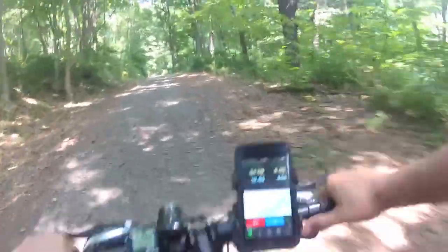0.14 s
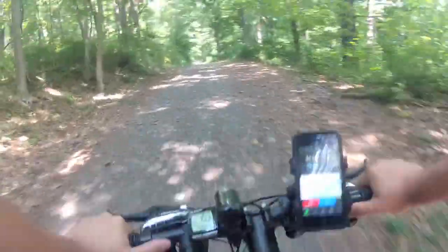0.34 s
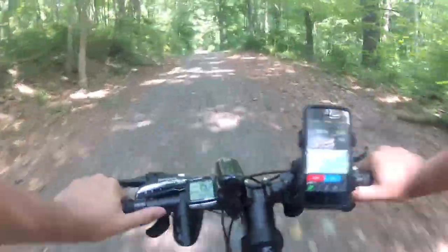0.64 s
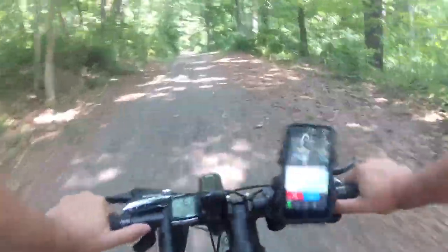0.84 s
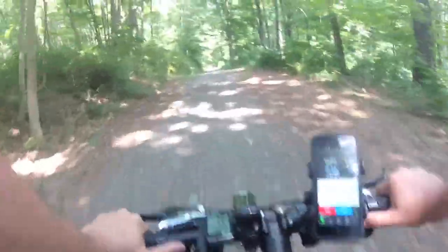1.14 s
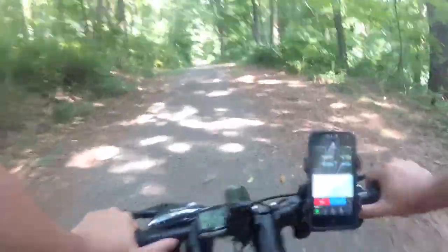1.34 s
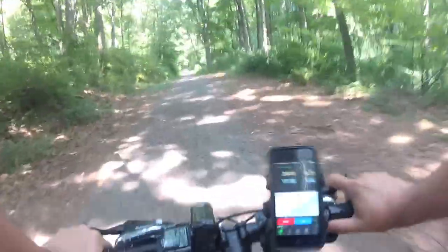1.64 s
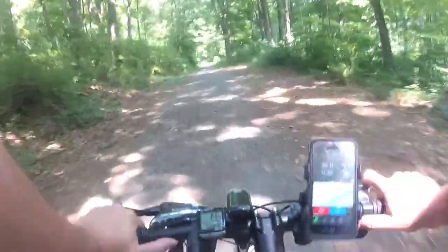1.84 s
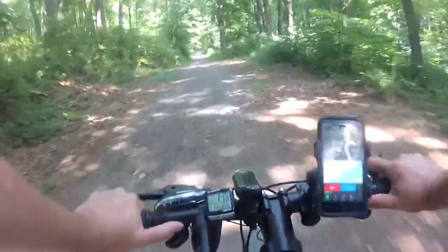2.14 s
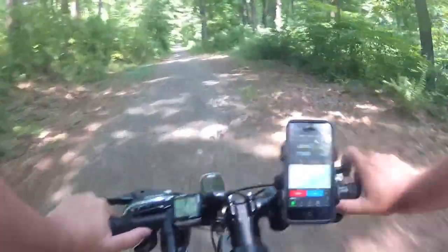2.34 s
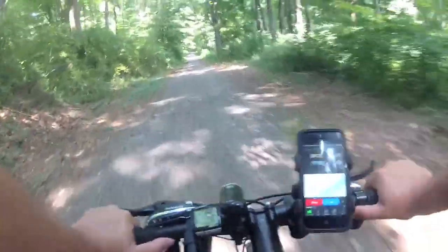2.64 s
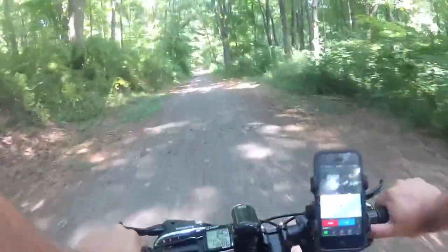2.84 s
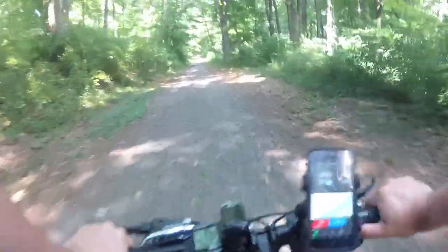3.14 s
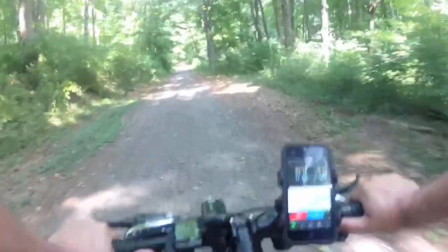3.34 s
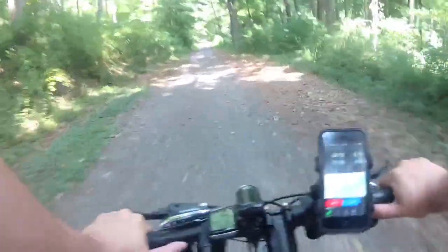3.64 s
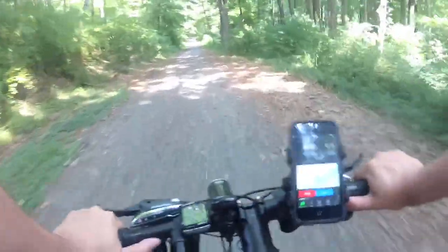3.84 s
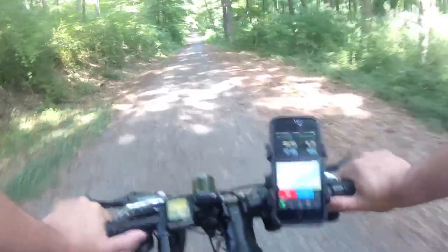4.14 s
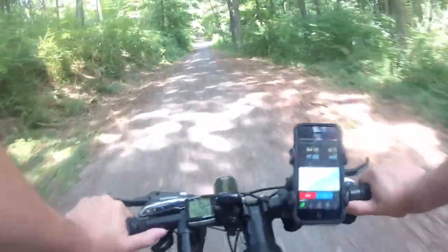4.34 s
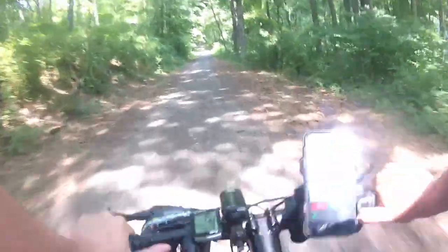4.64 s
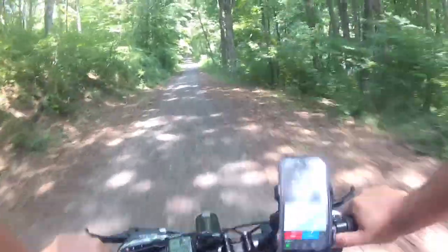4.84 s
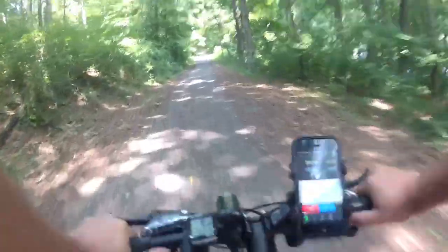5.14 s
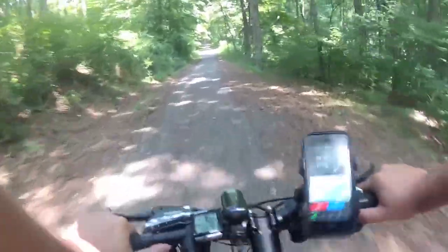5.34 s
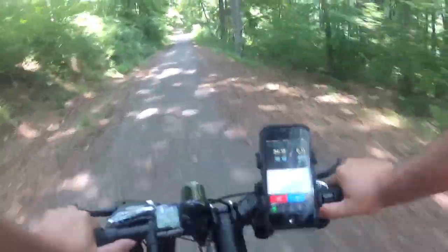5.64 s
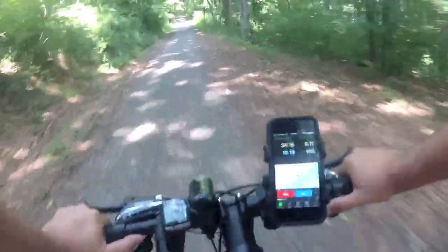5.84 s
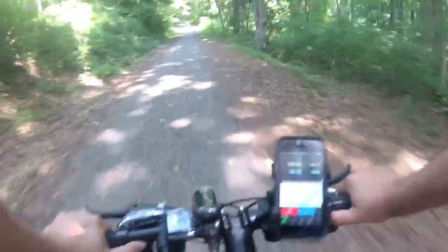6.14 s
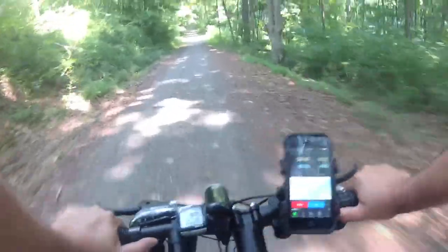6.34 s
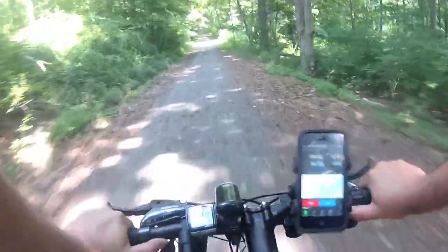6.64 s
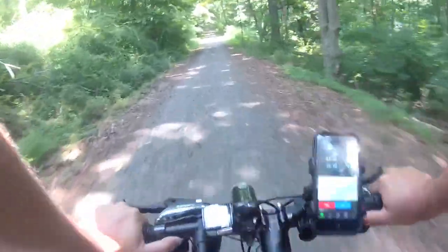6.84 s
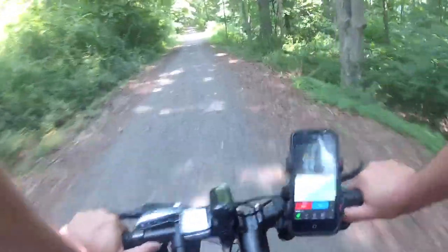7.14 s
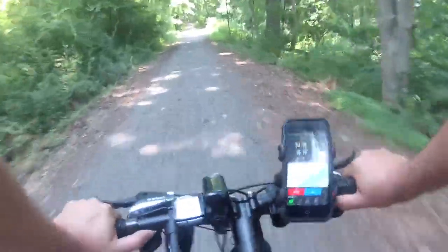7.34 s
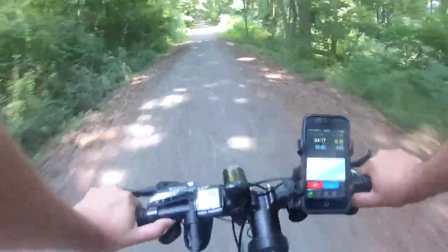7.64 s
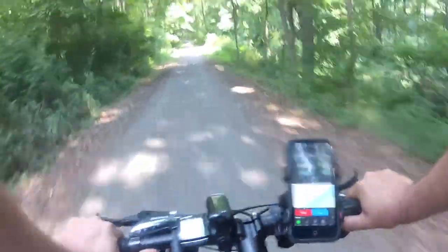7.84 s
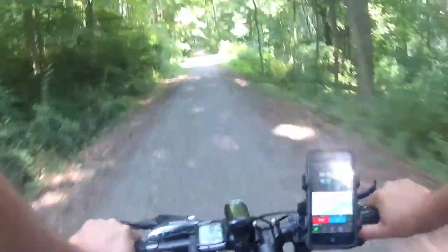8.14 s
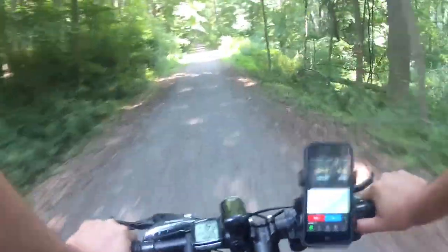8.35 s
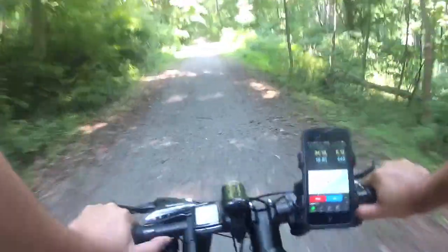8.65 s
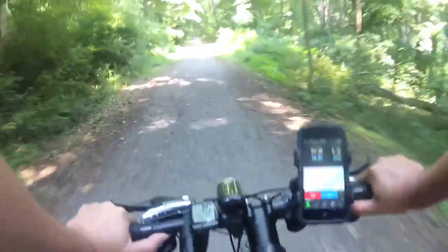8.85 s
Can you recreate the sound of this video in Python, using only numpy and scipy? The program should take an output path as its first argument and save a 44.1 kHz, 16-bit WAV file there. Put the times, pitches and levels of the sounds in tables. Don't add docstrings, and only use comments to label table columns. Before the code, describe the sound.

A bicycle rolls along a gravel trail in the woods, heard from a small cased microphone on the rider. Headwind rumbles and flutters low, stones crunch steadily, and hard plastic clacks, light ticks and dull mount knocks come irregularly. The wind swells strongly in the last third, and the jolts get denser near the end. The sound is boxy, close and gritty, with harsh treble.

```python
import sys
import numpy as np
from scipy import signal
from scipy.fft import rfft, irfft, next_fast_len
from scipy.io import wavfile
from scipy.ndimage import uniform_filter1d, minimum_filter1d, map_coordinates

SR = 44100
rng = np.random.default_rng(int(sys.argv[2]) if len(sys.argv) > 2 else 0)


def dump(signal):
    limited = np.clip(np.atleast_2d(signal).T, -1, 1)
    pcm = np.round(limited * 32767).astype(np.int16)
    wavfile.write(sys.argv[1], SR, pcm)


def natural_amplitude(level_db):
    exponent = np.asarray(level_db, float) / 20
    return 10 ** exponent


N = 396459

# start_s [s], strength_db [dB]
WIND_STRENGTH = [(0.0, -24), (0.17, -24), (0.65, -19), (0.85, -22), (1.55, -25), (2.4, -22), (2.9, -25),
                 (3.2, -25), (3.85, -20), (4.98, -22), (5.61, -17), (6.38, -17), (6.93, -14), (7.34, -13),
                 (7.51, -12), (7.79, -14), (8.59, -14), (8.99, -13)]
# start_s [s], lift_db [dB]
GUST_LIFTS = [(0.1, -4), (0.29, 4), (0.58, 5), (1.17, 4), (1.26, -4), (1.58, -6), (1.66, -6), (2.3, 5),
              (2.52, -5), (3.3, -4), (3.5, 3), (4.2, 4), (4.4, 3), (5.56, 4), (6.09, 4), (5.785, 9),
              (6.01, 8), (6.16, -5), (6.97, 5), (7.11, 5), (7.39, 7), (7.49, 6), (7.67, 4), (7.72, -4),
              (8.14, 3), (8.21, -7), (8.41, -5), (8.61, -5), (8.68, 6), (8.92, 7)]
# frequency_hz [Hz], density_db [dB per Hz]
BUFFET_SPECTRUM = [(8.8, -41), (15, -5.5), (91, 5), (145, 2.5), (178, -2), (224, -1), (320, -8.5),
                   (420, -34), (700, -120)]
# frequency_hz [Hz], density_db [dB per Hz]
ROAR_SPECTRUM = [(88, -28), (150, -3.5), (315, -4.5), (367, -1), (420, -6), (684, -10), (770, -17.5),
                 (858, -18.5), (1040, -31), (1300, -33), (1690, -56), (2860, -120)]


def wind():
    calm_db = -19
    strength_db, = curves(WIND_STRENGTH)
    above_calm_db = strength_db - calm_db
    gust_db = swells(GUST_LIFTS, half_s=.035)
    buffet_db = calm_db - 2.8 + 1.1 * above_calm_db + gust_db
    roar_db = calm_db - 3.3 + .9 * above_calm_db + .5 * gust_db
    eddy_db = 1.56 * wobble(30)
    buffet = filtered(rng.standard_normal(N), shape(BUFFET_SPECTRUM))
    roar = filtered(natural_amplitude(eddy_db) * rng.standard_normal(N), shape(ROAR_SPECTRUM))
    return natural_amplitude(buffet_db) * unit(buffet) + natural_amplitude(roar_db) * unit(roar)


# start_s [s], peak_db [dB], ring_hz [Hz], snap_db (treble) [dB]
HARD_JOLTS = [(0.2862, -12.5, 2000, -30), (0.4514, -5.5, 2800, -25), (0.5682, -6, 2720, -33),
              (0.9303, -14, 2730, -17), (0.9492, -6, 2200, -18), (1.359, -15, 2420, -24),
              (2.1375, -2.5, 2180, -22), (2.2356, -8, 2070, -21), (2.5017, -16, 2860, -11),
              (2.551, -14, 2550, -17), (2.6264, -12.5, 1910, -24), (3.3428, -3, 2000, -33),
              (3.7147, -1.5, 2710, -27), (3.9739, -12, 1830, -15), (4.0507, -8, 2720, -30),
              (4.1335, -1.5, 2250, -31), (4.89, -11, 1780, -15), (5.2624, -11, 3030, -27),
              (6.0913, -5.5, 2940, -19), (6.8169, -11.5, 2010, -14), (7.182, -11, 2900, -18),
              (7.8357, -5, 2060, -29), (7.9588, -3, 2670, -20), (8.0422, -8.5, 2100, -22),
              (8.1925, -9, 3270, -16), (8.268, -10, 2770, -16), (8.296, -14, 2740, -9),
              (8.356, -4, 2770, -15), (8.622, -10, 2030, -20), (8.867, -9.5, 1890, -20)]


def jolts():
    t = np.arange(SR // 20) / SR
    ring, rattle, snap, contact = np.zeros((4, N + len(t)))
    rise = (1 - np.exp(-t / .0004)) ** 2
    touch = np.exp(-((t - .0006) / .00005) ** 2)
    for start_s, peak_db, ring_hz, snap_db in HARD_JOLTS + taps():
        t60 = .009 - .00012 * peak_db
        at = slice(round(start_s * SR), round(start_s * SR) + len(t))
        swell = natural_amplitude(peak_db - 60 * t / max(t60, .004)) * rise
        rattle_grit, snap_grit = rng.standard_normal((2, len(t)))
        waver = .22 * np.cumsum(rattle_grit) * np.sqrt(ring_hz / SR)
        ring[at] += natural_amplitude(3.5) * swell * np.sin(2 * np.pi * ring_hz * t + waver)
        rattle[at] += natural_amplitude(3.5) * swell * rattle_grit
        contact[at] += natural_amplitude(1.15 * peak_db + 1) * touch
        snap[at] += natural_amplitude(snap_db + 23) * swell * snap_grit * natural_amplitude(-60 * t / 0.036)
    treble = modes([(4180, 4000, 0)])
    click = filtered(contact, modes([(2550, 2400, 2.5)]))
    rattle = filtered(rattle, lambda hz: case_modes(hz) + natural_amplitude(-27) * (hz < 4000))
    return ring[:N] + click + rattle + filtered(snap, lambda hz: treble(hz) ** 2)


# start_s [s], peak_db [dB], ring_hz [Hz]
LIGHT_TAPS = [(1.0116, -17, 2600), (1.268, -13.5, 2770), (2.1081, -18, 2980), (2.1221, -19, 2440),
              (2.1583, -15, 2110), (2.2993, -18, 2640), (2.5744, -18, 3140), (2.6943, -15.5, 1990),
              (2.7856, -19, 2830), (3.5263, -16, 2890), (3.5848, -15, 2920), (4.0073, -14.5, 3070),
              (4.8202, -15, 2170), (4.877, -14, 1820), (5.358, -16, 2810), (5.8396, -16, 2060),
              (5.926, -14.5, 3230), (6.213, -15, 2040), (6.328, -11, 2830), (6.3996, -14.5, 2990),
              (6.585, -16, 2090), (6.6189, -15, 2630), (6.7935, -15, 3450), (7.2335, -15, 2780),
              (7.3736, -12.5, 2630), (8.316, -13, 2020), (8.513, -18, 4500), (8.4537, -15, 2340),
              (8.5894, -15, 2720), (8.683, -12.5, 2760)]
# start_s [s], peak_db [dB]
GRIT_FLECKS = [(1.632, -23), (2.3865, -24), (2.412, -27), (2.496, -20), (2.5324, -19), (2.5637, -20),
               (2.6524, -23), (2.7746, -23), (2.9528, -22), (3.0884, -23), (3.4233, -23), (4.2428, -22),
               (4.4952, -22), (4.8574, -19), (5.005, -21), (5.036, -23), (5.1063, -22), (5.3285, -21),
               (5.6296, -25), (5.705, -19), (5.8311, -19), (5.9549, -20), (6.0791, -16), (6.5231, -17),
               (6.6633, -20), (7.0712, -19), (7.299, -18), (7.4843, -17), (8.426, -15), (8.6755, -20)]


def taps():
    rows = LIGHT_TAPS + chatter()
    luck = rng.random(len(rows)) - .5
    notes_hz = rng.uniform(1900, 3200, len(GRIT_FLECKS))
    light = [(s, db, hz, -27 - .45 * db + 10 * u) for (s, db, hz), u in zip(rows, luck)]
    flung = [(s, db, hz, -13) for (s, db), hz in zip(GRIT_FLECKS, notes_hz)]
    return light + flung


def chatter():
    count = 40
    roll_s, crunch_db = np.transpose(ROLLING)
    slot, size, note, detune = rng.random((count, 4)).T
    when = (np.arange(count) + slot) / count * (N / SR)
    roughness_db = np.interp(when, roll_s, crunch_db) - crunch_db.mean()
    db = -23 + 6 * (size - .5) + .8 * roughness_db
    hz = np.where(note < .5, 2030, 2830) * (1 + .16 * (detune - .5))
    return list(zip(when, db, hz))


# centre_hz [Hz], width_hz [Hz], level_db [dB]
CASE_RESONANCES = [(2060, 780, 0.5), (2770, 710, 7.5), (3260, 590, 3), (4110, 170, -0.5), (4900, 900, -15)]


def case_modes(hz):
    return modes(CASE_RESONANCES)(hz)


# start_s [s], peak_db [dB], pitch_hz [Hz]
MOUNT_BUMPS = [(0.285, -17, 506), (0.949, -16, 690), (1.267, -16, 519), (2.499, -20, 536),
               (2.552, -14, 479), (2.958, -16, 495), (3.341, -13, 500), (3.585, -16, 696),
               (3.714, -7.5, 552), (3.974, -11.5, 540), (4.133, -16, 425), (4.818, -18, 574),
               (4.889, -5, 480), (5.327, -6.5, 482), (5.954, -9, 460), (6.093, -8.5, 760), (7.18, -11, 533),
               (7.681, -4.5, 516), (7.837, -10, 552), (8.044, -10, 431), (8.192, -10.5, 690),
               (8.266, -9, 674), (8.356, -4, 570), (8.513, -5, 430), (8.621, -13, 675), (8.867, -16, 630)]


def bumps():
    t60 = .019
    t = np.arange(SR // 20) / SR
    rise = 1 - np.exp(-t / 0.00033)
    knock = np.zeros(N + len(t))
    for start_s, peak_db, pitch_hz in MOUNT_BUMPS:
        swing = natural_amplitude(peak_db + 3.5 - 60 * t / t60) * rise
        knock[round(start_s * SR):][:len(t)] += swing * np.sin(2 * np.pi * pitch_hz * t)
    return knock[:N]


# start_s [s], crunch_db [dB]
ROLLING = [(0.0, -32), (0.7, -35), (1.1, -33), (2.2, -34), (2.35, -37), (2.55, -33.5), (2.95, -33.5),
           (3.5, -31.5), (3.75, -33), (4.25, -31.5), (4.6, -33), (5.0, -31), (5.5, -32.5), (6.0, -29.5),
           (6.55, -28.5), (6.98, -32), (7.15, -29.5), (8.99, -28.5)]
# start_s [s], lift_db [dB]
DEEP_PATCHES = [(1.03, 3), (1.62, 3), (1.83, 2), (2.39, 4), (2.51, 3), (2.565, 6), (4.3, 2), (5.08, 3),
                (5.7, 2), (5.9, 3), (8.23, 2), (8.3, 2)]


def rolling_level():
    return curves(ROLLING)[0] - .5 + swells(DEEP_PATCHES, half_s=.03)


# frequency_hz [Hz], density_db [dB per Hz]
STONE_SPECTRUM = [(470, -35), (800, 6), (1270, -10.5), (1610, -20), (1970, -10.5), (2370, -9), (2830, -4.5),
                  (4280, -11), (5020, -13), (5990, -16), (7790, -76), (13200, -120)]


def tyres(crunch_db):
    clumps_db = 1.1 * wobble(30) + 2.6 * wobble(120)
    stones = shape(STONE_SPECTRUM)
    rubbing = natural_amplitude(0.91 * clumps_db) * rng.standard_normal(N)
    crackle = filtered(grains(3600, 1.03 * clumps_db), lambda hz: case_modes(hz) + natural_amplitude(-6.5) * (hz > 900))
    hiss = filtered(rubbing, lambda hz: stones(hz) * (1 + 0.3 * abs(case_modes(hz))))
    crunch = natural_amplitude(0.5) * unit(crackle) + unit(hiss)
    return natural_amplitude(crunch_db) * unit(crunch)


def grains(rate, clumps_db):
    when, size, pitch, life = rng.random((int(rate * N / SR), 4)).T
    at = (when * N).astype(int)
    hz = 1100 * 4.5 ** pitch
    decay = hz / (0.31 + 1.2 * life)
    t = np.arange(200) / SR
    size_db = 10.5 * np.sqrt(abs(np.log(size + .004)))
    gain = natural_amplitude(size_db + np.minimum(clumps_db[at], 5.5))
    ticks = gain[:, None] * np.exp(-t * decay[:, None]) * np.sin(2 * np.pi * hz[:, None] * t)
    places = at[:, None] + np.arange(len(t))
    return unit(np.bincount(places.ravel(), ticks.ravel())[:N])


# centre_hz [Hz], width_hz [Hz], level_db [dB]
FRAME_RESONANCES = [(366, 30, 0), (692, 45, -9), (985, 30, -24)]


def frame(crunch_db):
    drone = filtered(rng.standard_normal(N), modes(FRAME_RESONANCES))
    return natural_amplitude(1.1 * crunch_db + 6.3 + 1.3 * wobble(6)) * unit(drone)


def unit(x):
    return x / np.sqrt(np.mean(x ** 2) + 1e-20)


def shape(points):
    f, db = np.transpose(points)
    return lambda hz: natural_amplitude(np.interp(np.log(hz + 1), np.log(f + 1), db))


def modes(rows):
    def response(f):
        total = 0
        for k, (centre, width, db) in enumerate(rows):
            damping = 1j * f * width
            total = total + (-1) ** k * natural_amplitude(db) * damping / (centre * centre - f * f + damping)
        return total
    return response


def curves(rows):
    s, *cols = np.transpose(rows)
    return [np.interp(np.arange(N) / SR, s, c) for c in cols]


def swells(rows, half_s):
    return sum(db * np.exp(-((np.arange(N) / SR - s) / half_s) ** 2) for s, db in rows)


def wobble(rate):
    return map_coordinates(rng.standard_normal(N // 100), [np.arange(N) * rate / SR])


def filtered(x, response):
    m = next_fast_len(N + SR // 2)
    return irfft(rfft(x, m) * response(np.fft.rfftfreq(m, 1 / SR)), m)[..., :N]


def opened(band, over_db, hold):
    power = uniform_filter1d(band ** 2, SR // 300)
    usual = uniform_filter1d(band ** 2, SR // 2)
    loud = power > natural_amplitude(2 * over_db) * usual
    kept = 1 - minimum_filter1d(1. - loud, round(hold * SR))
    return band * uniform_filter1d(kept, SR // 200)


def scene():
    crunch_db = rolling_level()
    return (wind() + jolts() + bumps() + tyres(crunch_db) + frame(crunch_db))[None]


def band_limit(x):
    return signal.sosfilt(signal.butter(12, 16620, fs=SR, output="sos"), x)


def record(dry):
    hold_hz, clock_hz = 12000, 48000
    smooth = filtered(dry, lambda hz: 1 / (1 + (hz / 5200) ** 12) * (hz < hold_hz / 2) * (hz > 12))
    limited = smooth / (1 + np.abs(smooth / 1.1) ** 8) ** (1 / 8)
    sampled = limited * (1 + 2 * np.cos(2 * np.pi * hold_hz * np.arange(N) / SR + np.pi / 4))
    held = filtered(sampled, lambda hz: np.sinc(hz / hold_hz) / np.sinc(hz / clock_hz))
    band = lambda lo, hi: filtered(held, lambda hz: (hz >= lo) & (hz < hi))
    high = natural_amplitude(-11) * opened(band(15290, 15800), over_db=7, hold=.016)
    highest = natural_amplitude(-13) * opened(band(15800, 16620), over_db=14, hold=.002)
    return band_limit(band(0, 15290) + high + highest)


dry = scene()
out = record(dry)
dump(out)
```